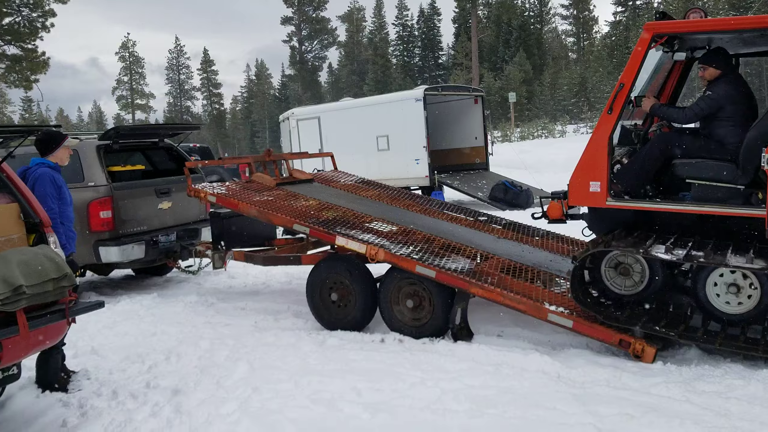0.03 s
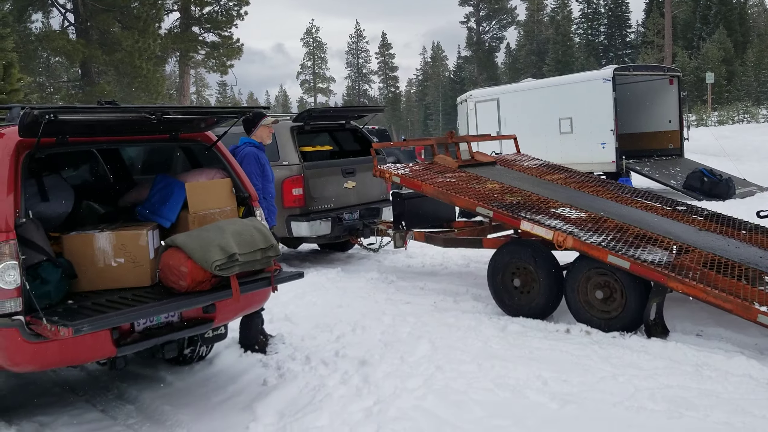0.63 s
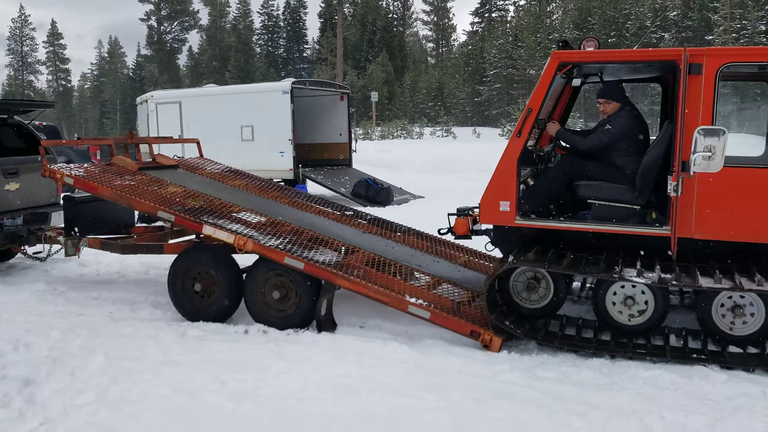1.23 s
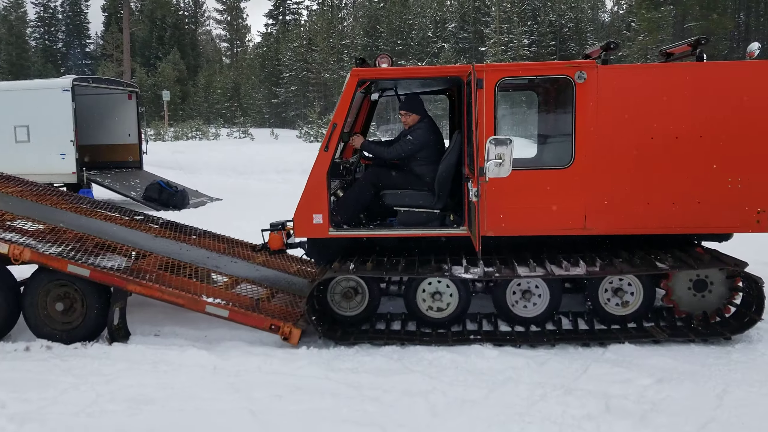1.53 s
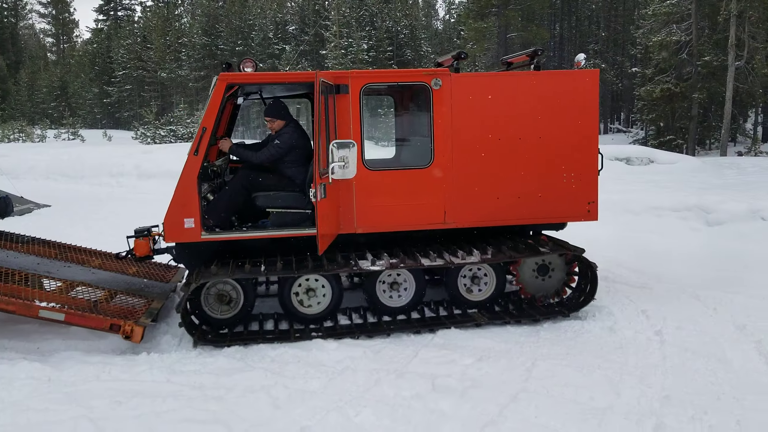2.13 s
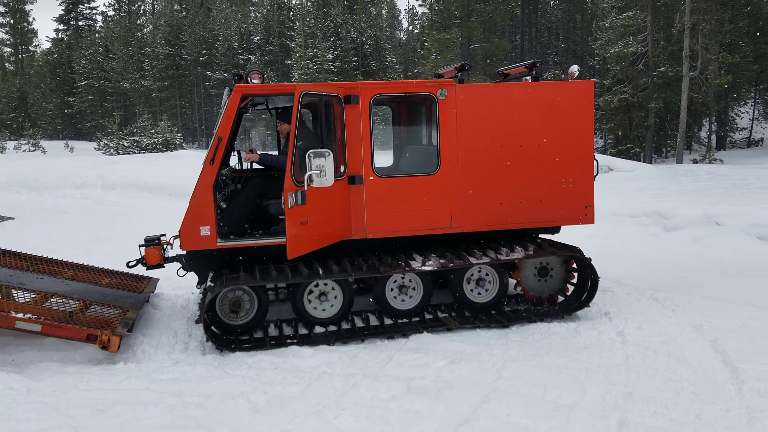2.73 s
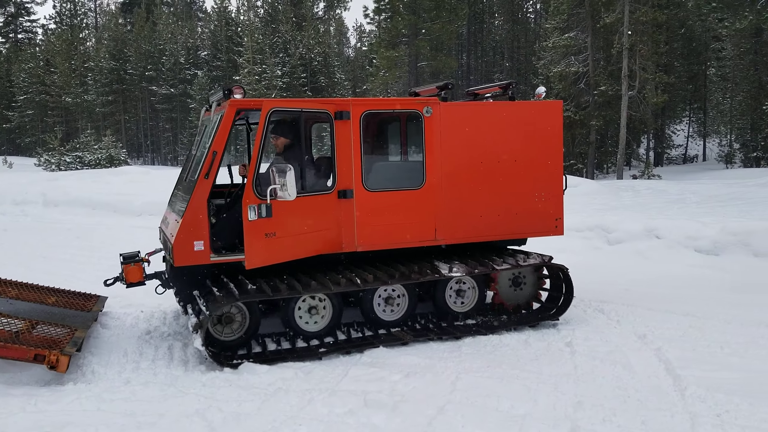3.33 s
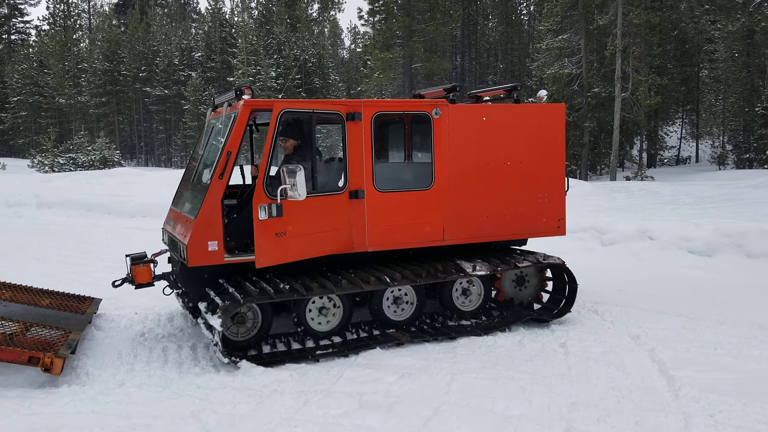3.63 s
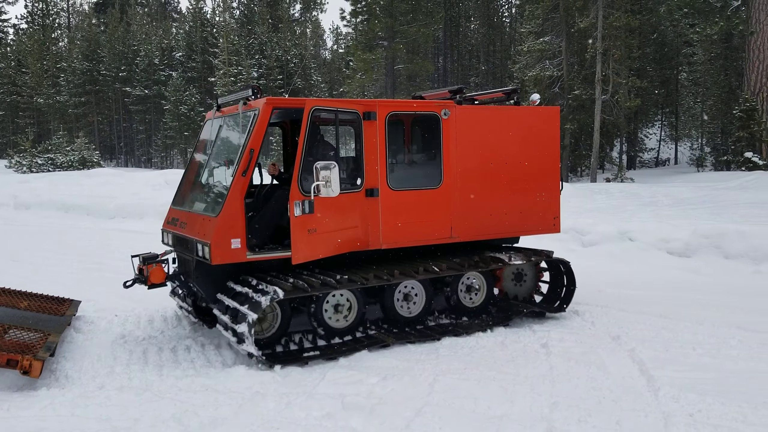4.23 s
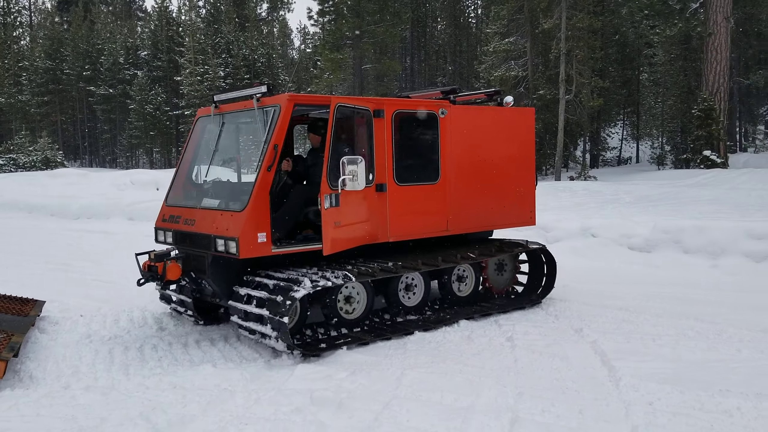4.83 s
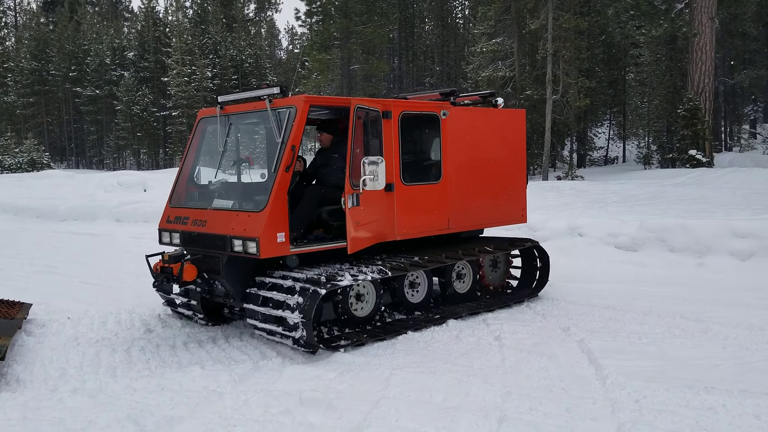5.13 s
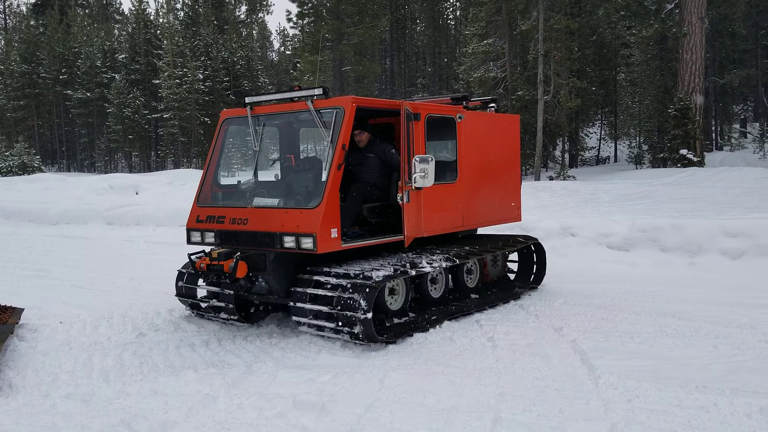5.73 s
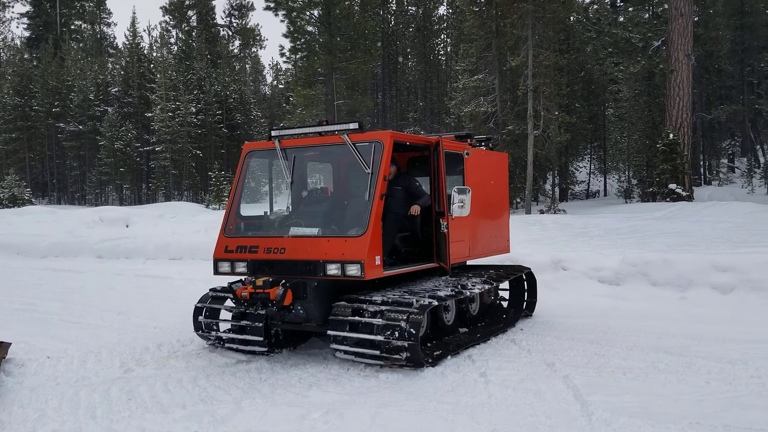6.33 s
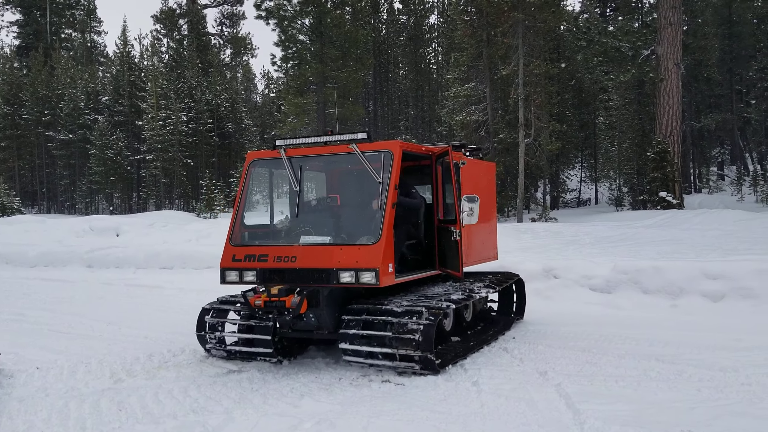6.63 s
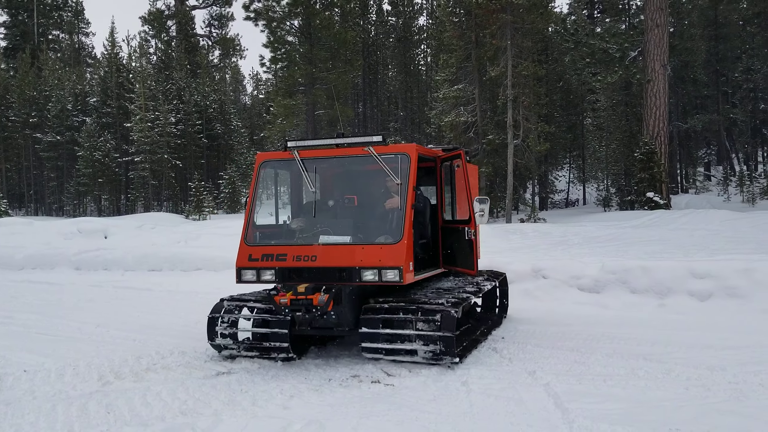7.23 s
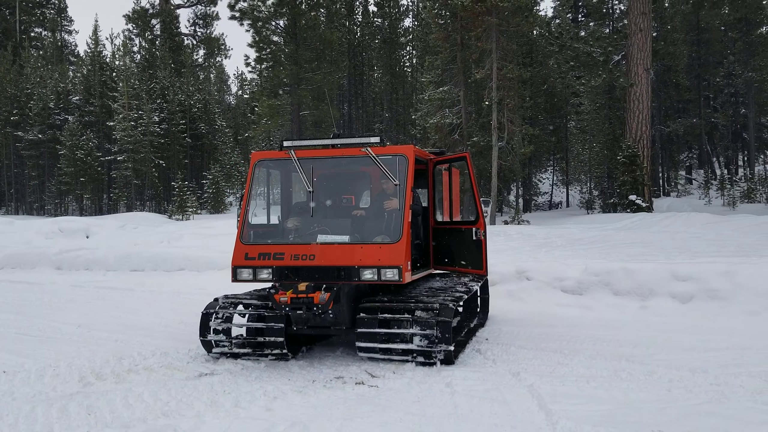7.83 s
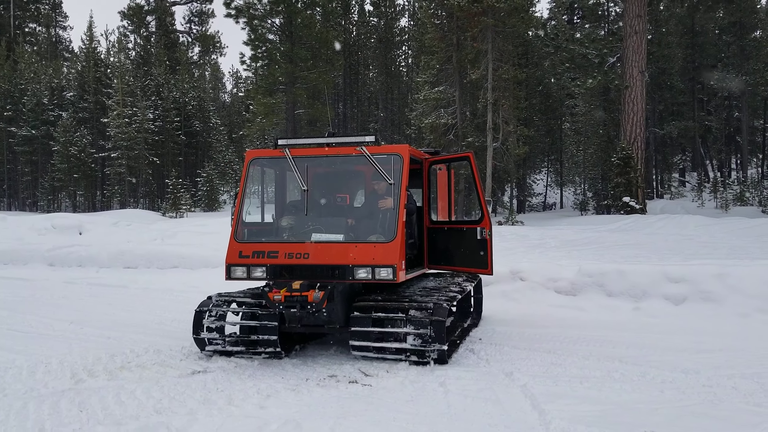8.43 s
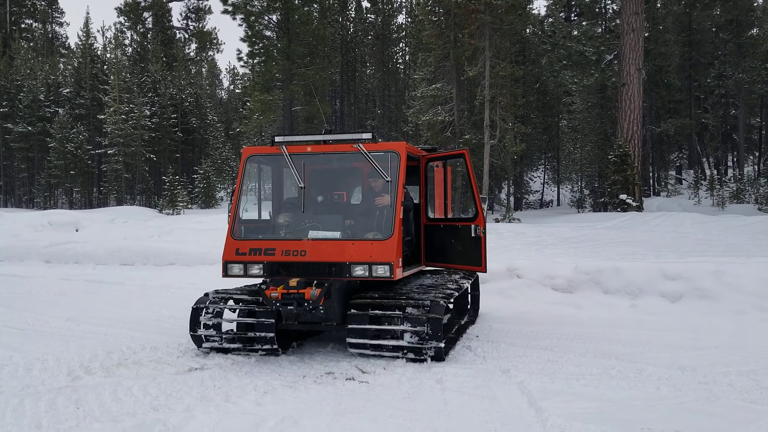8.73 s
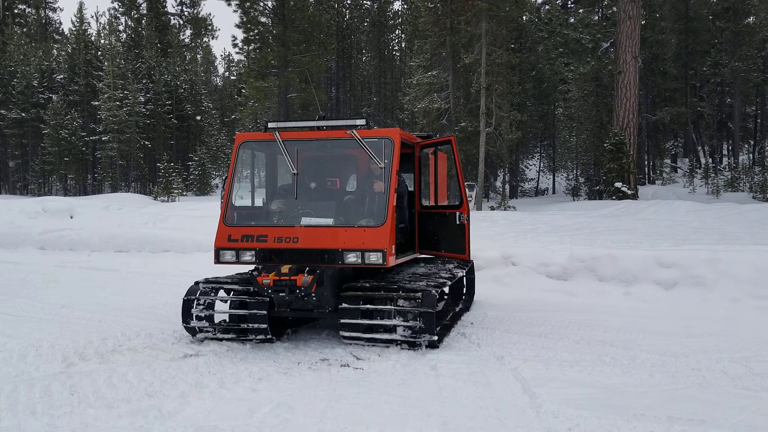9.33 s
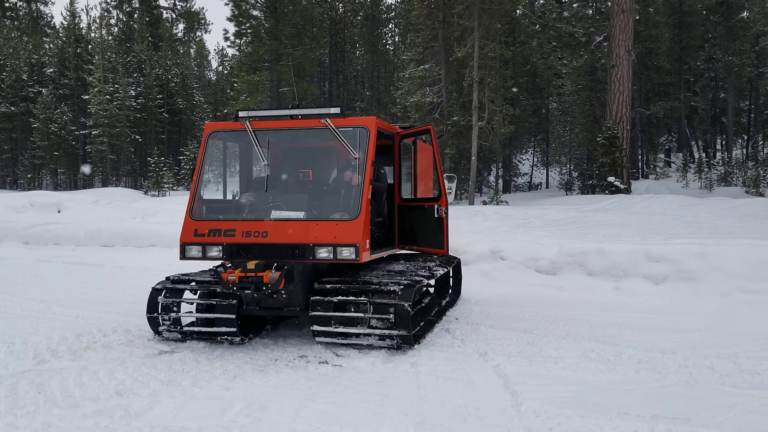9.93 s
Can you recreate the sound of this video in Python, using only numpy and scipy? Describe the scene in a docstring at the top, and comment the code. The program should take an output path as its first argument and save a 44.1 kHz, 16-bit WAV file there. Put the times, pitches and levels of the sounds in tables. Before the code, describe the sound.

A tracked snow vehicle's engine drones and clatters as it clanks off a steel ramp, drives, drops to idle and revs again.

```python
"""A snowcat's six-cylinder engine runs as it backs off a steel ramp, turns on snow, idles and revs again.
The exhaust drones and chugs under block knock, valve clatter, pulsing hiss and a loose tappet,
all locked to the crankshaft. Track cleats scrape and clank on the ramp, metal ticks and clicks,
rough whines glide while driving and the hull bumps a few times.
A rasping whirr and a faint falling engine tone near 500 Hz pass during the idle."""
import sys
import numpy as np
from scipy import signal
from scipy.fft import rfft, irfft, next_fast_len
from scipy.io import wavfile
from scipy.ndimage import uniform_filter1d

SR = 44100
rng = np.random.default_rng(int(sys.argv[2]) if len(sys.argv) > 2 else 0)


def unload_audio(sound):
    """Save the sound as a 16-bit wav file, at the path given as the first command line argument."""
    columns = np.transpose(np.atleast_2d(sound))
    # keep every value between -1 and 1, then stretch to whole-number steps
    steps = np.round(np.clip(columns, -1, 1) * 32767)
    wavfile.write(sys.argv[1], SR, steps.astype(np.int16))


N = 439677
TIME = np.arange(N) / SR


def amp(db):
    """Decibels to gain."""
    return 10 ** (np.asarray(db) / 20)


def unit_rms(x):
    """Scales to an rms of one."""
    return x / np.sqrt(np.mean(x ** 2) + 1e-20)


def curve(table, column=1):
    """One table column, linear in time."""
    rows = np.asarray(table)
    return np.interp(TIME, rows[:, 0], rows[:, column])


def at_hz(spectrum, hz):
    """Spectrum value, linear in log frequency."""
    freq_hz, value = np.transpose(spectrum)
    return np.interp(np.log(hz + 1), np.log(freq_hz + 1), value)


def add(mix, start_s, sound):
    """Mixes in a stereo sound."""
    part = mix[:, max(round(start_s * SR), 0):][:, :sound.shape[1]]
    part += sound[:, :part.shape[1]]


def wander(rate_hz, size=4096):
    """Random drift below rate_hz, unit rms."""
    hz = np.fft.rfftfreq(size, TIME[-1] / size)
    slow = unit_rms(irfft(rfft(rng.standard_normal(size)) / (1 + (hz / rate_hz) ** 4)))
    return np.interp(TIME, np.linspace(0, TIME[-1], size), slow)


def colour(x, spectrum, size=4096):
    """Minimum-phase filter: blows ring on, never ahead."""
    gain_db = at_hz(spectrum, abs(np.fft.fftfreq(size, 1 / SR)))
    log_gain = np.log(amp(np.maximum(gain_db, -100)))
    impulse = np.fft.ifft(np.exp(signal.hilbert(log_gain).conj())).real
    return signal.oaconvolve(x, impulse[None, :size // 2], axes=1)[:, :x.shape[1]]


def unit_band(pair, band_hz):
    """Scales a pair so its mid has unit rms within a band."""
    bandpass = signal.butter(4, band_hz, "bandpass", fs=SR, output="sos")
    return pair / signal.sosfilt(bandpass, pair.mean(0)).std()


def by_load(drive, load, loaded, idle, band_hz):
    """Crossfades from the idle spectrum to the loaded one."""
    loaded_sound = unit_band(colour(drive, loaded), band_hz)
    idle_sound = unit_band(colour(drive, idle), band_hz)
    return load * loaded_sound + (1 - load) * idle_sound


# left-right likeness: freq_hz, correlation
COHERENCE = [(200, 0.84), (400, .9), (750, 0.83), (1300, 0.37), (2400, 0.46), (4400, -0.13), (15000, 0.13)]
# stereo balance: freq_hz, left_minus_right_db
BALANCE = [(160, -5.5), (450, 4), (740, -0.5), (1220, 6.5), (2100, -3.5), (3300, 0.5), (5500, 3),
           (15000, 6.5)]

def stereo(pair):
    """Two independent signals to stereo: alike in the bass, apart in the treble."""
    size = next_fast_len(pair.shape[1], True)
    hz = np.fft.rfftfreq(size, 1 / SR)
    same = np.clip(at_hz(COHERENCE, hz), 0, 1)
    lean = amp(at_hz(BALANCE, hz) / 2)
    mid, side = rfft(pair, size) * np.sqrt([(1 + same) / 2, (1 - same) / 2])
    return irfft(np.array([(mid + side) * lean, (mid - side) / lean]), size)[:, :pair.shape[1]]


def taps(events, spectrum, t60_s, gain_db=0):
    """Short blows on a damped part; each peaks at its level plus gain_db."""
    t, out = np.arange(SR // 4) / SR, np.zeros((2, N))
    decay = amp(-60 * t / t60_s)
    for start_s, level_db in events:
        blow = colour(stereo(rng.standard_normal((2, len(t))) * decay), spectrum)
        add(out, start_s, amp(level_db + gain_db) * blow / abs(blow).max())
    return out


# engine speed: time_s, firing_hz
SPEED = [(0.0, 33.6), (0.25, 34.0), (0.52, 47.7), (1.1, 48.2), (1.62, 49.9), (1.8, 47.5), (2.48, 53.6),
         (3.2, 51.1), (3.8, 52.3), (4.25, 57.6), (5.3, 58.9), (5.95, 61.0), (6.55, 52.5), (7.0, 53.4),
         (7.35, 52.3), (7.59, 32.1), (8.15, 33.5), (8.4, 32.1), (8.68, 35.1), (9.5, 32.8), (9.72, 46.6),
         (9.97, 54.5)]

def crankshaft(idle_hz=32.8, loaded_hz=50.45, lead_s=0.05):
    """Running count of firings, slightly uneven, and the load (0-1), which leads the flywheel's speed."""
    firing_hz = curve(SPEED)
    firings = np.cumsum(firing_hz) / SR + 0.008 * wander(12)
    coming_hz = np.interp(TIME + lead_s, TIME, firing_hz)
    load = np.clip((coming_hz - idle_hz) / (loaded_hz - idle_hz), 0, 1)
    return firings, load


# cylinders in firing order: puff_db, knock_db, valve_db, hiss_db
CYLINDERS = [(3.5, 5.5, 2, 13.5), (1, 4, 1, 9), (-3.5, 6, 0, 9.5), (2.5, 2.5, 2.5, 12),
             (2.5, 5.5, -2.5, 10.5), (1, 4, 0.5, 7.5)]
PUFF_COLUMN, KNOCK_COLUMN, VALVE_COLUMN, HISS_COLUMN = range(4)

def strokes(firings, column, lag_firings, uneven_db):
    """One blow per firing: sample, cylinder, force."""
    count = np.floor(firings - lag_firings).astype(int)
    at = np.flatnonzero(np.diff(count) > 0)
    cylinder = count[at] % len(CYLINDERS)
    scatter_db = uneven_db * rng.uniform(-1, 1, size=1024)[:len(at)]
    return at, cylinder, amp(np.asarray(CYLINDERS)[cylinder, column] + scatter_db)


def rattle(blows, rise_s, t60_s, fresh_share, ringing_db, rush_db, size=3072):
    """Each cylinder rings its own dense modes, partly renewed per blow, over a steady rush."""
    t, out = np.arange(size) / SR, np.zeros((2, N))
    own = rng.standard_normal((len(CYLINDERS), 2, size))
    rush = rng.standard_normal((2, N))
    envelope = (1 - np.exp(-t / rise_s)) * amp(-60 * t / t60_s)
    for at, cylinder, force in zip(*blows):
        fresh = rng.standard_normal((2, size))
        ring = np.sqrt(1 - fresh_share) * own[cylinder] + np.sqrt(fresh_share) * fresh
        # each blow favours a few modes, so it clinks with a pitch
        favour = unit_rms(uniform_filter1d(rng.standard_normal(size // 2 + 1), size=5))
        ring = unit_rms(irfft(rfft(ring) * amp(ringing_db * np.minimum(favour, 2))))
        add(out, at / SR, force * envelope * ring)
    return stereo(unit_rms(out) + amp(rush_db) * rush)


# exhaust pulse force with throttle: time_s, gain_db
THROTTLE = [(0, 5), (.25, 1.5), (.5, 5.5), (1.4, 3.5), (3.8, 3), (4.7, 2.5), (6.3, 4.5), (7.37, 1.5),
            (7.45, -7), (7.55, -10.5), (7.78, -2), (7.97, -7), (8.12, -4), (9.48, -1.5), (9.62, 2),
            (9.97, 7)]
# vehicle half hidden, then side on, then facing the listener: time_s, aside_share, head_on_share
ASPECT = [(0, 0.9, 0), (1.2, 0.54, 0.04), (2.3, 0.07, 0.15), (5.1, 0.01, 0), (6.55, 0.3, 0.43),
          (6.9, 0.48, 0.81), (7.6, 0.47, 0.7)]

def strength(load, idle_db, loaded_db, throttle_share, aside_db, head_on_db):
    """Gain of an engine noise from load, throttle and the side heard."""
    load_db = idle_db + (loaded_db - idle_db) * load
    aspect_db = aside_db * curve(ASPECT, 1) + head_on_db * curve(ASPECT, 2)
    return amp(load_db + throttle_share * curve(THROTTLE) + aspect_db)


# exhaust pipe resonances: freq_hz, gain_db
PIPE = [(33, -20), (48, -26), (58, -19), (70, -11), (96, -4), (106, -6), (118, -10.5), (135, -23.5),
        (158, -15.5), (178, -18.5), (194, -28.5), (210, -20.5), (240, -24.5), (300, -32)]
# harmonics from the firing rate up: relative_db, idle_change_db, head_on_change_db
HARMONICS = [(1, -15.5, -5.5), (-11, 3.5, 0.14), (-7.5, -12, -1.7), (-14.5, -7.3, 7.5), (-19.5, 0.6, 8)]

def exhaust_drone(firings, load, gain_db=0.04, sway_db=0.92, lag_firings=0.1, dispersion_rad=1.713):
    """Low harmonics swell as they cross the pipe's resonances; they flutter most at idle."""
    out = np.zeros((2, N))
    stereo_rad = np.array([[0.027], [-0.027]])
    firing_hz, throttle_db, head_on = curve(SPEED), curve(THROTTLE), curve(ASPECT, 2)
    flutter_depth = 0.085 + 0.2 * (1 - load)
    for k, (db, idle_db, head_on_db) in enumerate(HARMONICS, 1):
        own_db = db + idle_db * (1 - load) + head_on_db * head_on + sway_db * wander(3.9)
        level = amp(gain_db + own_db + throttle_db + at_hz(PIPE, k * firing_hz))
        flutter = 1 + flutter_depth * wander(28)
        phase = 2 * np.pi * k * (firings - lag_firings) + dispersion_rad * k * (k - 2)
        out += level * flutter * np.cos(phase + stereo_rad)
    return out


# muffler response: freq_hz, gain_db
MUFFLER = [(25, -72), (50, -5.5), (85, 3), (130, 3), (200, -6.5), (280, -8.5), (400, -24), (600, -41),
           (1200, -83.5)]

def exhaust_puffs(firings, load):
    """Uneven pulses chug through the muffler at idle; under load turbulent gas takes over."""
    blows = at, _, force = strokes(firings, PUFF_COLUMN, lag_firings=0.3, uneven_db=2)
    pulses = np.zeros(N)
    pulses[at] = force - 0.5 * force.mean()  # the drone carries some of the even part
    gas = rattle(blows, rise_s=0.003, t60_s=0.05, fresh_share=0.2, ringing_db=-1, rush_db=-2)
    gas_gain = amp(-5 + 9 * load)
    drive = (unit_rms(pulses) + gas_gain * unit_rms(gas)) / np.sqrt(1 + gas_gain ** 2)
    level = strength(load, idle_db=-43, loaded_db=-48, throttle_share=0.72, aside_db=0, head_on_db=4.5)
    return level * unit_band(colour(drive, MUFFLER), band_hz=(270, 450))


# block response: freq_hz, gain_db
BLOCK_LOADED = [(250, -7), (420, -10.5), (492, -8), (555, 0), (598, -3.5), (795, -1.5), (879, -5.5),
                (1120, -10), (1410, -10.5), (1550, -8.5), (1900, -15), (2470, -29), (4180, -120)]
BLOCK_IDLE = [(250, -41), (420, -14.5), (569, -14.5), (714, -1), (820, -21.5), (863, -11), (961, -21),
              (1330, -18), (1730, -14.5), (1900, -14), (2470, -34), (4180, -120)]

def block_knock(firings, load):
    """Combustion knocks in the block and engine cover."""
    blows = strokes(firings, KNOCK_COLUMN, lag_firings=0.35, uneven_db=2)
    drive = rattle(blows, rise_s=0.0022, t60_s=0.067, fresh_share=0.53, ringing_db=6, rush_db=-2)
    level = strength(load, idle_db=-42, loaded_db=-42, throttle_share=0.5, aside_db=-4, head_on_db=-1.5)
    return level * by_load(drive, load, BLOCK_LOADED, BLOCK_IDLE, band_hz=(500, 1600))


# valve gear response: freq_hz, gain_db
VALVES_LOADED = [(1060, -30.5), (1800, -2), (1890, -2.5), (2090, 0.5), (2240, 7), (2400, 8), (2800, 0),
                 (3500, -7), (4550, -48), (7700, -120)]
VALVES_IDLE = [(1060, -23.5), (1800, -34.5), (2000, -1), (2310, -2), (2560, -12), (2920, -13), (3500, -44),
               (4550, -23), (7700, -120)]
# loose steel modes: freq_hz, width_hz, gain_db
STEEL_MODES = [(2092, 49, 6.5), (2180, 12, 6), (2247, 19, 4), (2424, 31, 4)]
# harder clatter as the tracks shake the hull: start_s, end_s, boost_db
SHAKES = [(1.57, 3.598, 4), (4.474, 5.28, 2.5), (6.218, 6.802, 2.5), (9.418, 9.968, 3.5)]

def valve_clatter(firings, load, jingle_db=-4, band_hz=(1900, 2900)):
    """Valve gear rings just above 2 kHz, loudest once a revolution; loose steel jingles under load."""
    blows = strokes(firings, VALVE_COLUMN, lag_firings=0.15, uneven_db=2)
    drive = rattle(blows, rise_s=0.003, t60_s=0.09, fresh_share=0.25, ringing_db=8, rush_db=-11)
    clatter = by_load(drive, load, VALVES_LOADED, VALVES_IDLE, band_hz)
    jingle = sum(amp(db) * signal.lfilter(*signal.iirpeak(hz, hz / width_hz, fs=SR), drive)
                 for hz, width_hz, db in STEEL_MODES)
    share = amp(jingle_db) * load
    shake_db = sum(db * np.sin(np.pi * np.clip((TIME - start_s) / (end_s - start_s), 0, 1))
                   for start_s, end_s, db in SHAKES)
    level = strength(load, idle_db=-46, loaded_db=-35.5, throttle_share=0.1,
                     aside_db=-0.5, head_on_db=-4.5)
    return level * amp(shake_db) * (clatter + share * unit_band(jingle, band_hz)) / (1 + share / 2)


# gas and fan spectrum: freq_hz, gain_db
HISS_LOADED = [(1940, -12), (3300, -16), (3910, -2.5), (4250, -0.5), (4940, 2.5), (6050, -4.5), (6930, -4),
               (8770, -12.5), (9990, -7), (11600, -7.5), (13000, -1), (15600, -17)]
HISS_IDLE = [(1940, -10.5), (3300, -4), (4280, -4), (4660, -2), (6620, -4.5), (7600, -7), (7900, -9),
             (8650, -17.5), (9860, -8), (10700, -7), (12400, 1.5), (13500, -7), (15600, -14)]

def gas_hiss(firings, load, idle_fan_db=-1):
    """Gas spurts and fine clinks at each firing; at idle the fan's even rush covers much of them."""
    blows = strokes(firings, HISS_COLUMN, lag_firings=0.15, uneven_db=1.5)
    spurts = rattle(blows, rise_s=0.002, t60_s=0.085, fresh_share=0.35, ringing_db=8.5, rush_db=-3)
    fan = unit_rms(stereo(rng.standard_normal((2, N))))
    fan_gain = amp(idle_fan_db) * (1 - load)
    drive = (unit_rms(spurts) + fan_gain * fan) / np.sqrt(1 + fan_gain ** 2)
    level = strength(load, idle_db=-43, loaded_db=-38.5, throttle_share=0.61,
                     aside_db=-11, head_on_db=-2.5)
    return level * by_load(drive, load, HISS_LOADED, HISS_IDLE, band_hz=(3500, 15000))


# cleats sliding on the ramp: time_s, level_db
SCRAPE_LEVEL = [(.25, -44.5), (.42, -32.5), (.7, -38), (1, -39.5), (1.4, -42.5), (1.8, -40)]
# scrape spectrum: freq_hz, gain_db
SCRAPE_SPECTRUM = [(900, -1.5), (2400, -10.5), (2900, 8), (3300, -2), (3800, -1), (4500, -5), (8000, -11),
                   (15000, -56)]

def track_scrape(firings):
    """The shaking tracks grate on the ramp in short slips."""
    blows = strokes(firings, KNOCK_COLUMN, lag_firings=0.74, uneven_db=23)
    slips = rattle(blows, rise_s=0.003, t60_s=0.06, fresh_share=0.9, ringing_db=6, rush_db=-3)
    on_ramp = TIME < SCRAPE_LEVEL[-1][0]
    return amp(curve(SCRAPE_LEVEL)) * on_ramp * unit_rms(colour(slips, SCRAPE_SPECTRUM))


# metal ticks: start_s, relative_db
TICKS = [(0.1042, -33), (0.6838, -32), (0.9353, -27), (1.0226, -29), (1.1238, -29), (2.164, -25),
         (2.5491, -21.5), (2.6773, -23.5), (4.6813, -24), (5.1412, -28), (7.2649, -47), (9.3445, -37.5)]
# tick spectrum: freq_hz, gain_db
TICK_SPECTRUM = [(900, -47), (1800, -3), (2200, 15), (2550, -2), (3200, -11), (5000, -3.5), (9000, -17),
                 (15000, -22)]

def metal_ticks():
    """Single hard ticks ring near 2.2 kHz."""
    return taps(TICKS, TICK_SPECTRUM, t60_s=0.089, gain_db=9)


# tappet response: freq_hz, gain_db
TAPPET_SPECTRUM = [(900, -17), (1800, 2), (2200, 27), (2700, -31), (5000, -25), (6500, 9.5), (7600, 9),
                   (8400, -10), (10500, 5), (15000, -10)]

def tappet(firings, load, idle_db=-36.5, loaded_db=-31.5, uneven_db=2, lag_firings=4.4):
    """One loose tappet ticks once per engine cycle, harder under load."""
    cycle = np.floor((firings - lag_firings) / len(CYLINDERS))
    at = np.flatnonzero(np.diff(cycle) > 0)
    scatter_db = uneven_db * rng.standard_normal(size=256)[:len(at)]
    peak_db = idle_db + (loaded_db - idle_db) * load[at] + scatter_db
    return taps(zip(at / SR, peak_db), TAPPET_SPECTRUM, t60_s=0.1)


# cleat strikes: start_s, relative_db
CLANKS = [(0.245, -17.5), (0.557, -18), (0.598, -16), (1.199, -15), (1.593, -22)]
# ramp modes: freq_hz, spread_hz, gain_db
RAMP_MODES = [(680, 127, 10), (984, 75, 9.5), (1550, 45, -2), (1713, 36, 9)]
# loose grating response: freq_hz, gain_db
GRATING = [(250, -37), (600, -1), (1200, -1.5), (1800, -4), (3000, -11), (5500, -12), (9000, -34),
           (15000, -27)]

def cleat_clanks(gain_db=1, ring_t60_s=0.3, grating_db=3, grating_t60_s=0.33,
                 rise_s=0.0006, crack_db=10, crack_s=0.0065):
    """Each cleat cracks steel on steel, rings the ramp's modes and shakes its loose grating."""
    t, out = np.arange(SR // 2) / SR, np.zeros((2, N))
    hz, spread_hz, db = np.transpose(RAMP_MODES)[:, :, None]
    mode_decay, grating_decay = amp(db - 60 * t / ring_t60_s), amp(-60 * t / grating_t60_s)
    attack = 1 - np.exp(-t / rise_s)
    for start_s, relative_db in CLANKS:
        detune, phase = rng.random((2, 2, len(RAMP_MODES), 1))
        mode_hz = hz + spread_hz * (detune - 0.5)
        ring = (mode_decay * np.sin(2 * np.pi * (mode_hz * t + phase))).sum(1)
        grating = colour(rng.standard_normal((2, len(t))) * grating_decay, GRATING)
        crack = rng.standard_normal((2, len(t))) * np.exp(-t / crack_s)
        body = unit_rms(ring) + amp(grating_db) * unit_rms(grating)
        blow = stereo(body * attack + amp(crack_db) * crack)
        add(out, start_s, amp(relative_db + gain_db) * blow / abs(blow).max())
    return out


# gliding tones while driving, then a faint falling engine tone near 500 Hz at idle:
# start_s, end_s, from_hz, to_hz, level_db, waver_share
WHINES = [(2.299, 4.705, 1482, 1645, -41.5, 0.049), (3.55, 6, 618, 849, -40.5, .022),
          (3.798, 6.394, 340, 427, -52, 0.027), (5.705, 7.548, 541, 581, -44.5, 0.019),
          (8.848, 9.558, 530, 477, -43.5, 0.023)]

def rough_whine(start_s, end_s, from_hz, to_hz, level_db, waver_share, flutter_db=5, fade_s=0.49):
    """A rough tone glides to a new pitch and levels off; its level flutters."""
    glide = np.sin(np.pi / 2 * np.clip((TIME - start_s) / (end_s - start_s), 0, 1))
    pitch_hz = (from_hz + (to_hz - from_hz) * glide) * (1 + waver_share * wander(57.4))
    fade = np.clip(np.minimum(TIME - start_s, end_s - TIME) / fade_s, 0, 1)
    flutter = unit_rms(amp(flutter_db * np.clip(wander(25), -2, 1.5)))
    return amp(level_db) * fade * flutter * np.sin(2 * np.pi * np.cumsum(pitch_hz) / SR)


# clicks: start_s, relative_db
CLICKS = [(2.4516, -13), (7.091, -19.5)]
# click spectrum: freq_hz, gain_db
CLICK_SPECTRUM = [(1500, -25), (4000, -3), (10000, 0), (15000, -1)]

def bright_clicks():
    """Tiny treble clicks that die at once."""
    return taps(CLICKS, CLICK_SPECTRUM, t60_s=0.012, gain_db=4)


# blows on the hull: start_s, relative_db
BUMPS = [(2.94, -13), (7.78, -18), (8.073, -16.5), (8.19, -20), (8.97, -17)]
# hull response: freq_hz, gain_db
HULL_SPECTRUM = [(35, -26), (90, 17), (200, 16), (340, 7.5), (500, -2), (800, -15), (1600, -42),
                 (4000, -38), (9000, -70)]

def hull_bumps():
    """Dull blows thud in the hull."""
    return taps(BUMPS, HULL_SPECTRUM, t60_s=0.2, gain_db=-1)


# whirr during the idle: time_s, rasp_rate_hz, level_db
WHIRR = [(8.5, 69, -58), (8.63, 48, -39.5), (8.78, 92, -48), (8.95, 97, -46), (9.1, 87, -61)]
# rasp spectrum: freq_hz, gain_db
RASP_SPECTRUM = [(1200, -46), (1700, -2), (1950, -3), (2350, -1), (2700, -10), (4000, -27)]

def whirr():
    """One short rasp repeats fast: a comb of lines that glides with its rate."""
    start_s, end_s = WHIRR[0][0], WHIRR[-1][0]
    count = np.floor(np.cumsum(curve(WHIRR, 1)) / SR)
    pulses = np.diff(count, prepend=0) * (TIME > start_s) * (TIME < end_s)
    rasp = stereo(rng.standard_normal((2, 1024)))
    comb = colour(signal.oaconvolve(pulses[None], rasp, axes=1)[:, :N], RASP_SPECTRUM)
    sounding = comb[:, round(start_s * SR):round(end_s * SR)]
    return amp(curve(WHIRR, 2)) * comb / sounding.std()


def scene():
    """The crankshaft times the engine and the track scrape; impacts, whines and whirr join them."""
    firings, load = crankshaft()
    engine_parts = (exhaust_drone, exhaust_puffs, block_knock, valve_clatter, gas_hiss, tappet)
    engine = sum(part(firings, load) for part in engine_parts)
    impacts = metal_ticks() + bright_clicks() + hull_bumps()
    whines = sum(rough_whine(*row) for row in WHINES)
    return engine + impacts + whines + whirr() + track_scrape(firings) + cleat_clanks()


def record(dry):
    """Steep treble cutoff."""
    cutoff_hz = 15850
    lowpass = signal.firwin(511, cutoff_hz, window=("kaiser", 9), fs=SR)
    return signal.oaconvolve(dry, lowpass[None], "same")


dry = scene()
out = record(dry)
unload_audio(out)
```